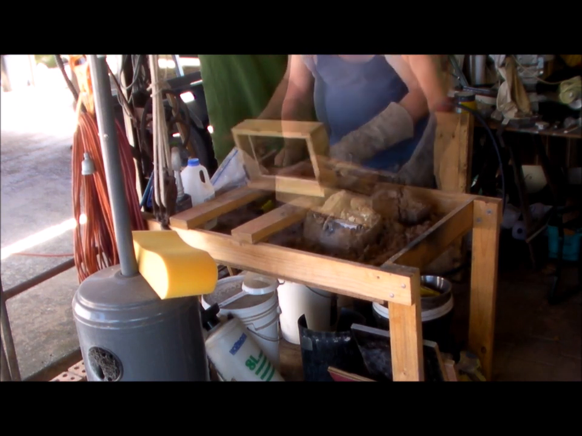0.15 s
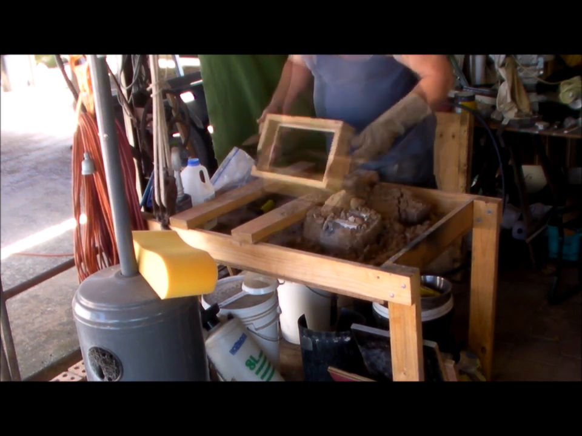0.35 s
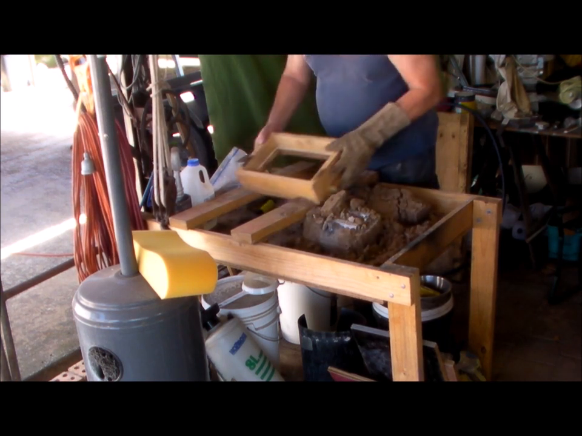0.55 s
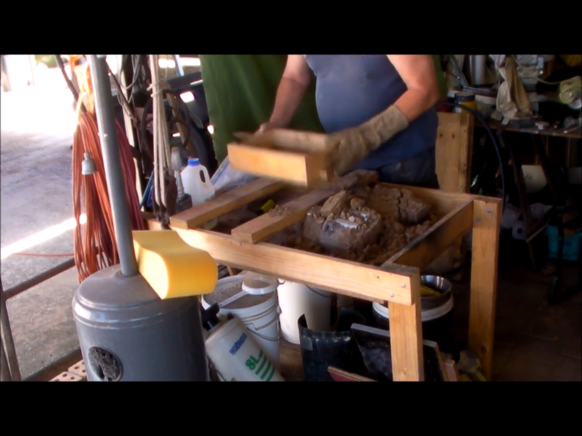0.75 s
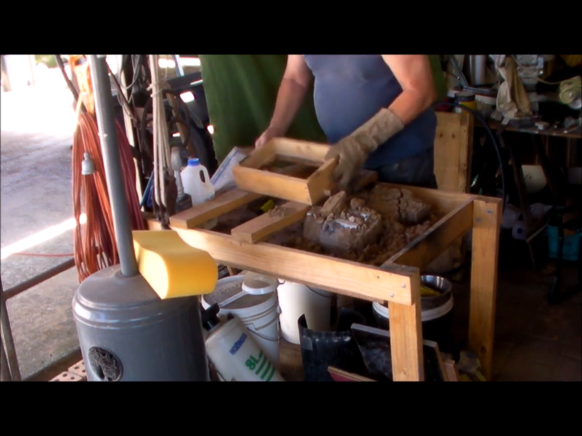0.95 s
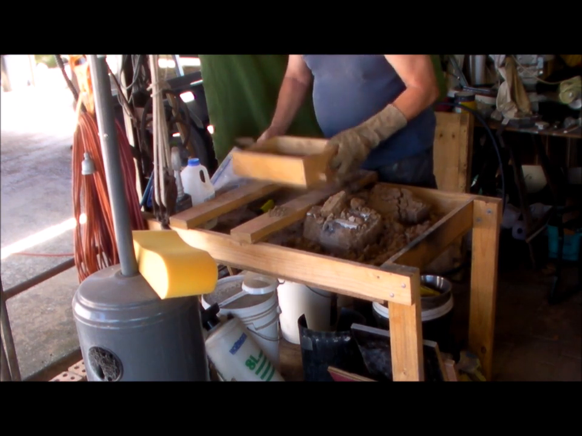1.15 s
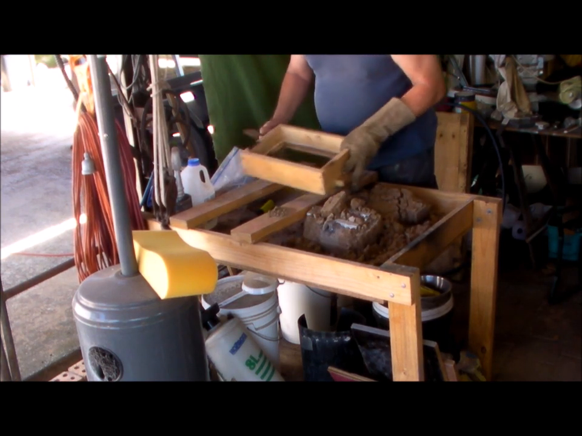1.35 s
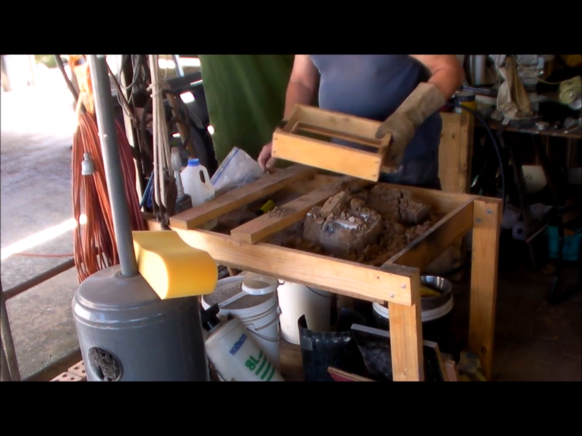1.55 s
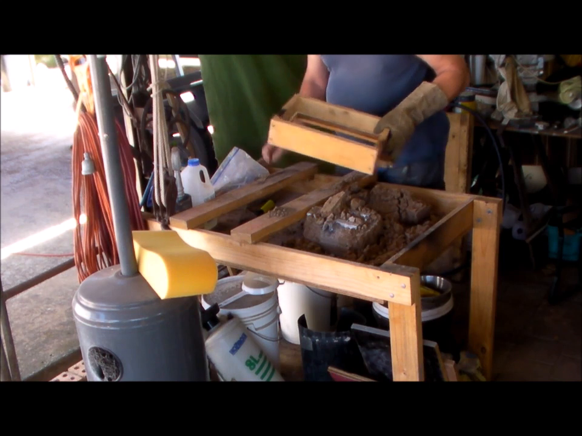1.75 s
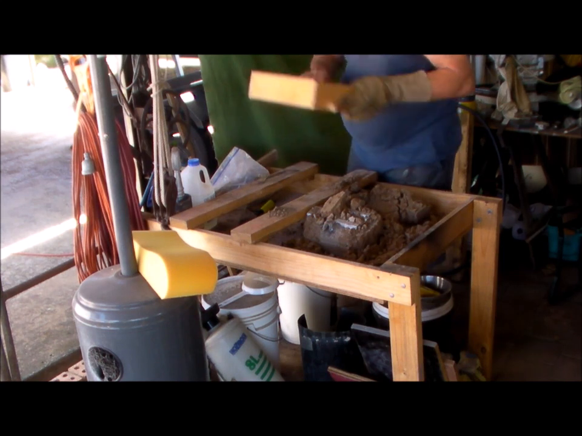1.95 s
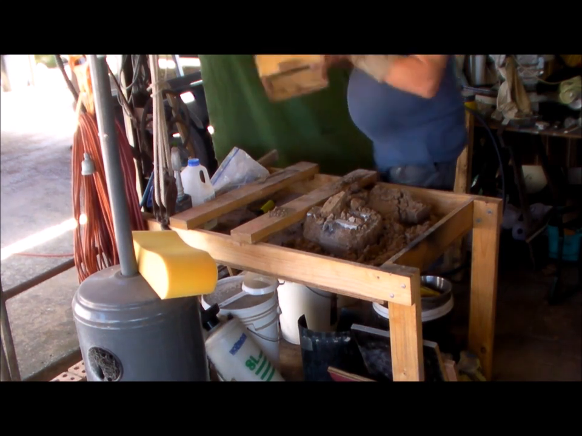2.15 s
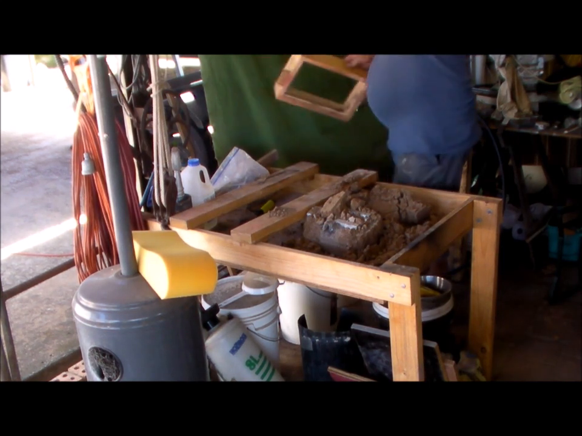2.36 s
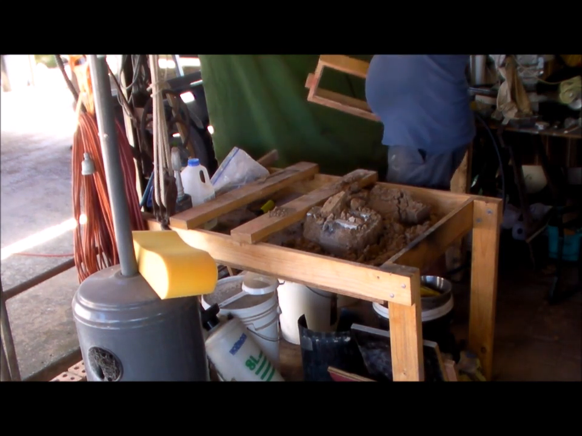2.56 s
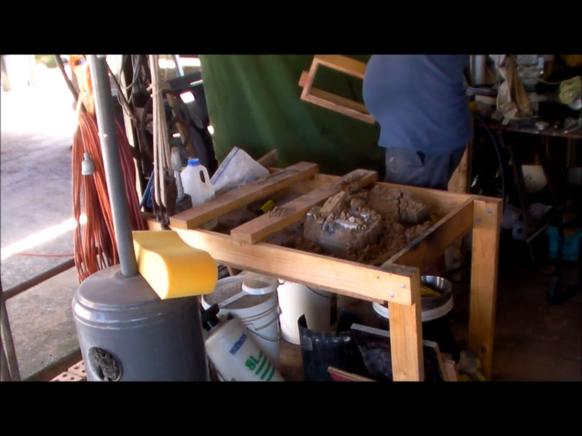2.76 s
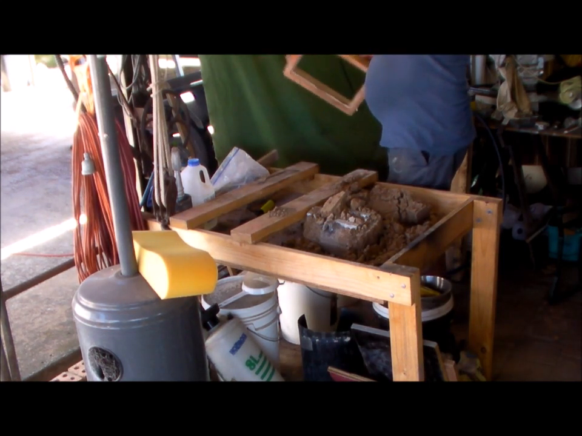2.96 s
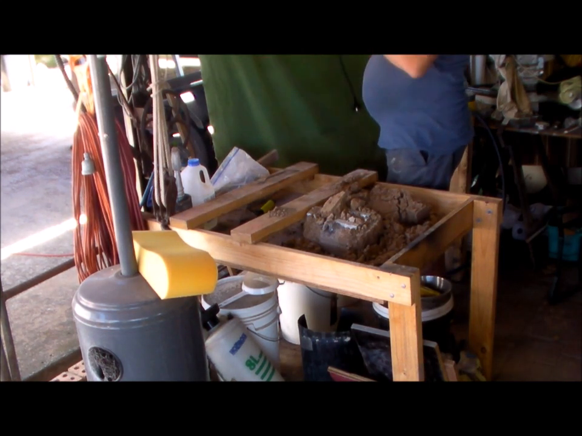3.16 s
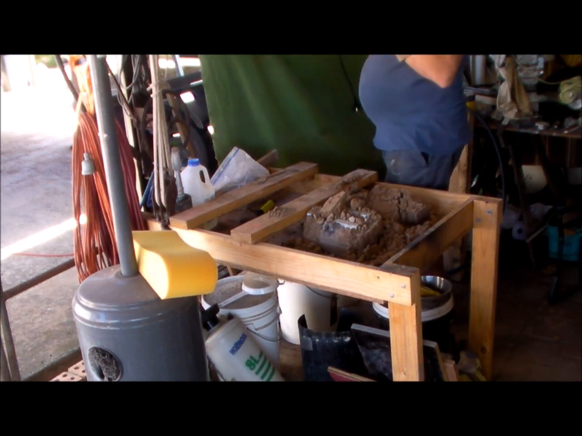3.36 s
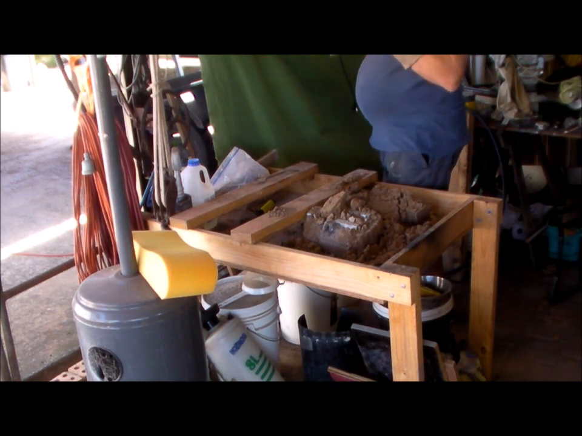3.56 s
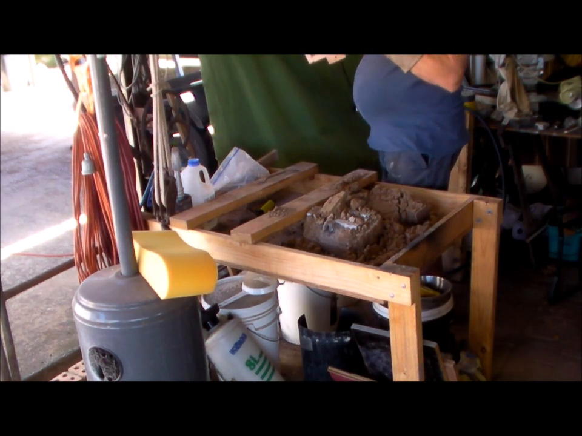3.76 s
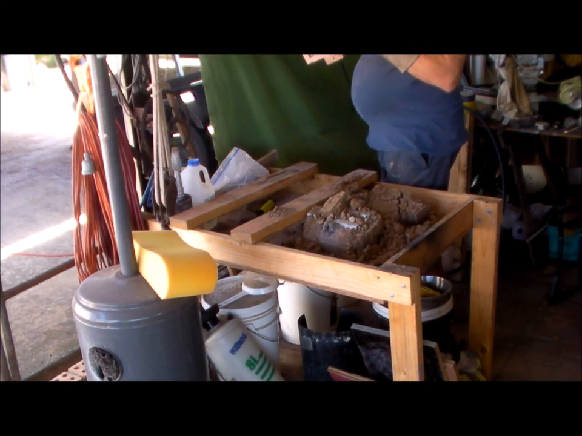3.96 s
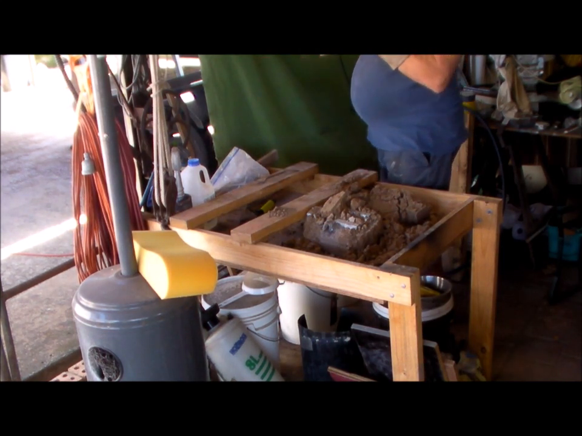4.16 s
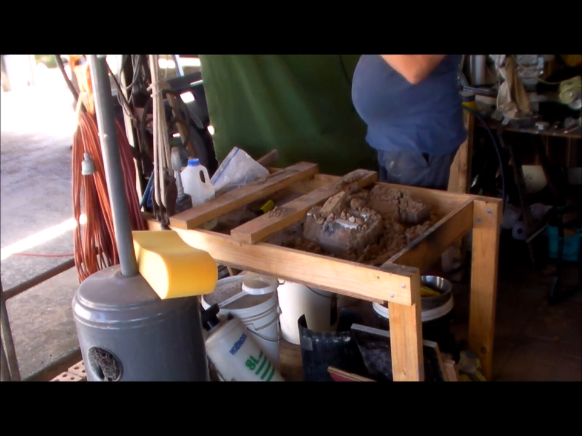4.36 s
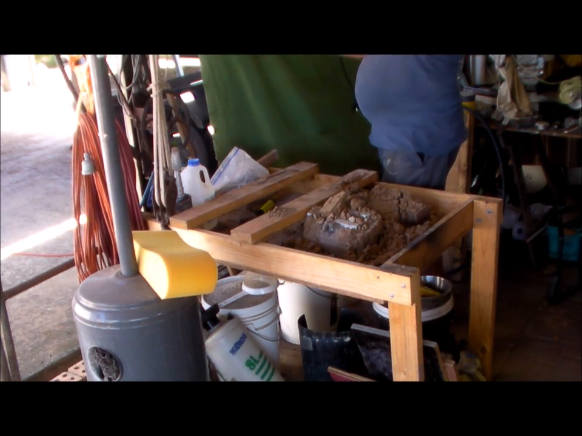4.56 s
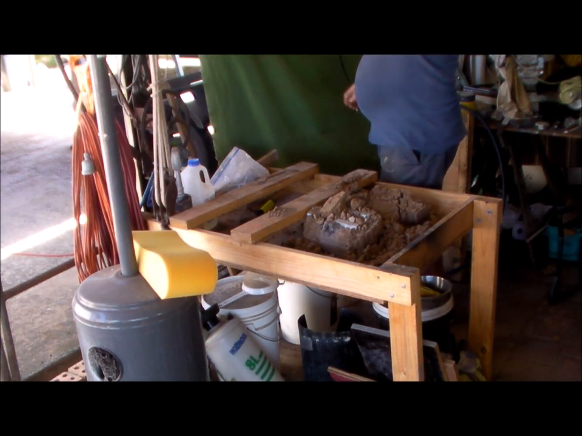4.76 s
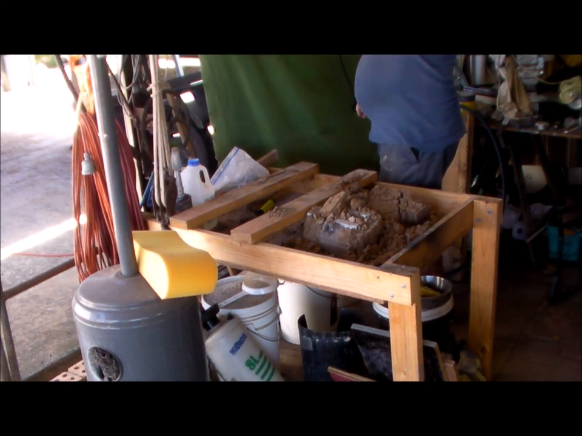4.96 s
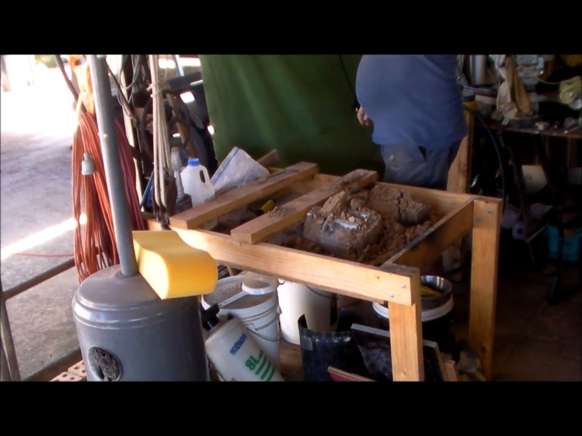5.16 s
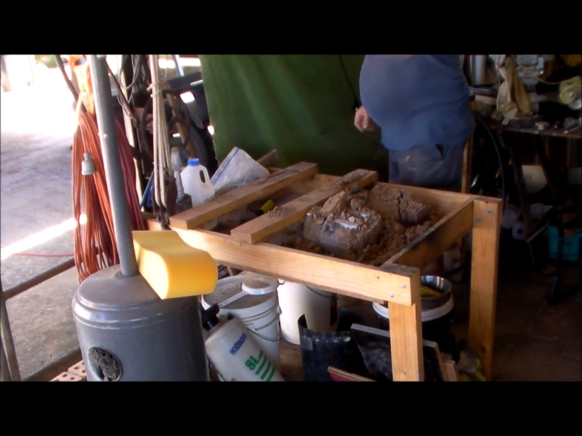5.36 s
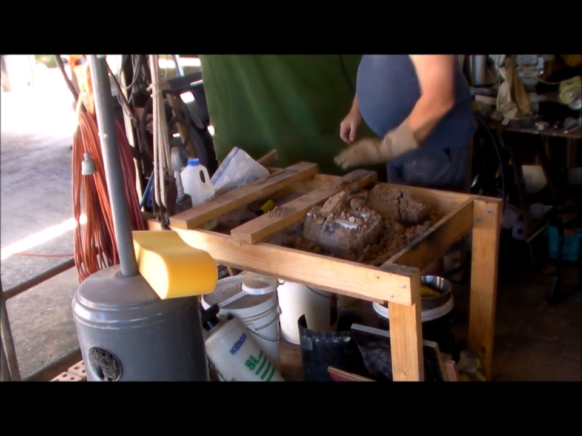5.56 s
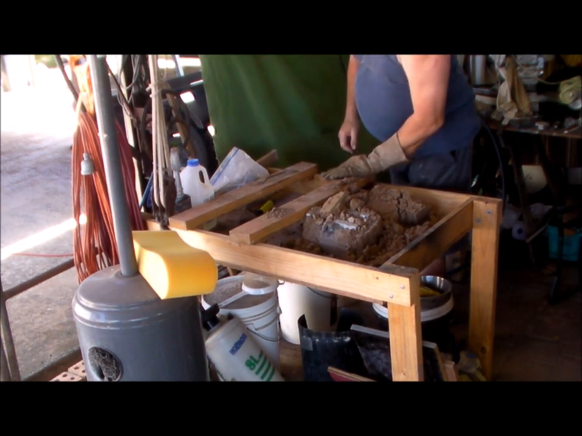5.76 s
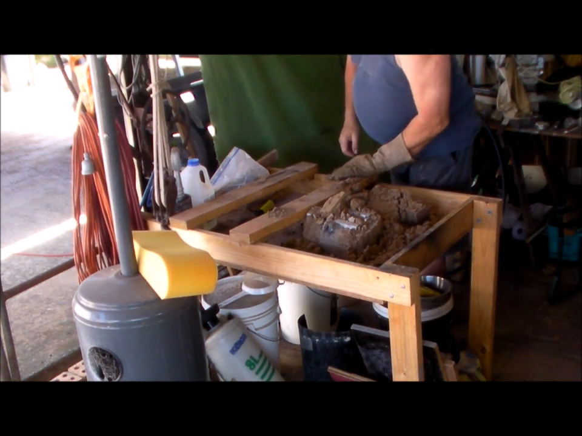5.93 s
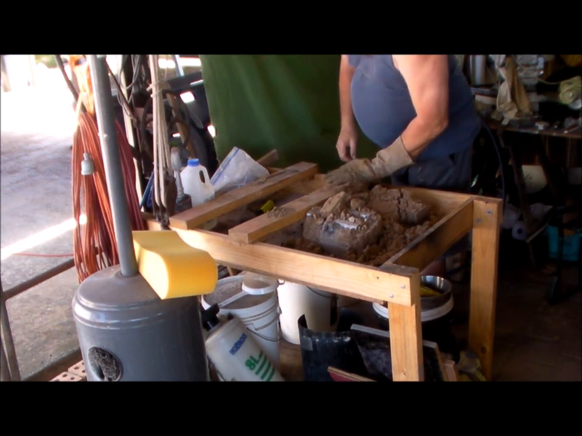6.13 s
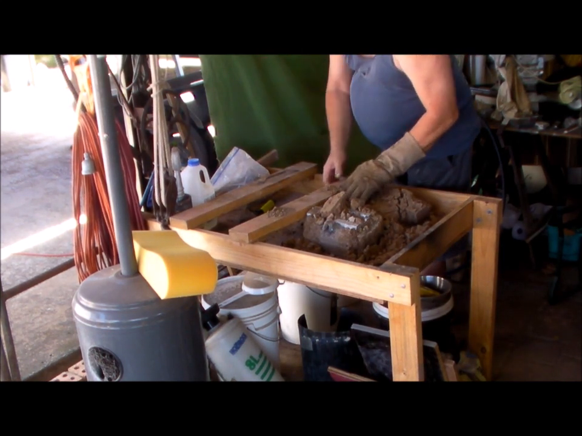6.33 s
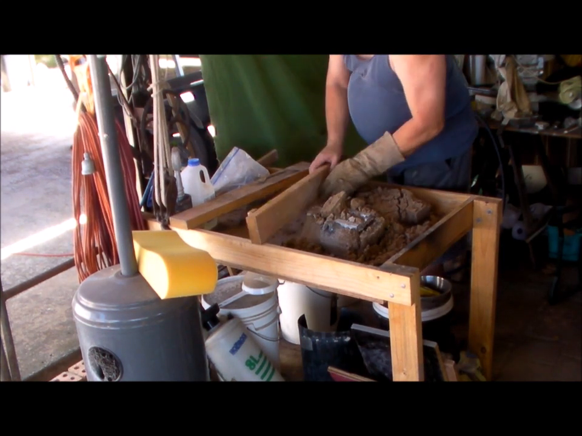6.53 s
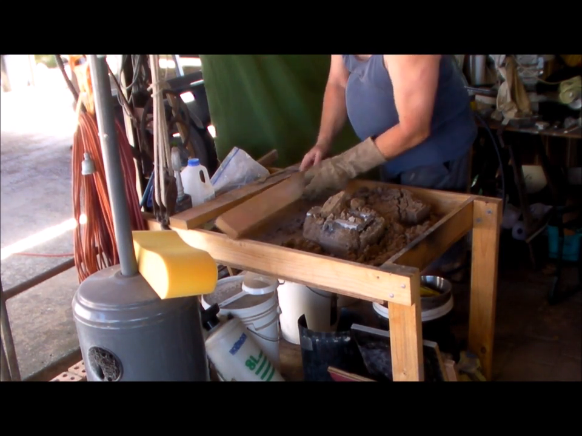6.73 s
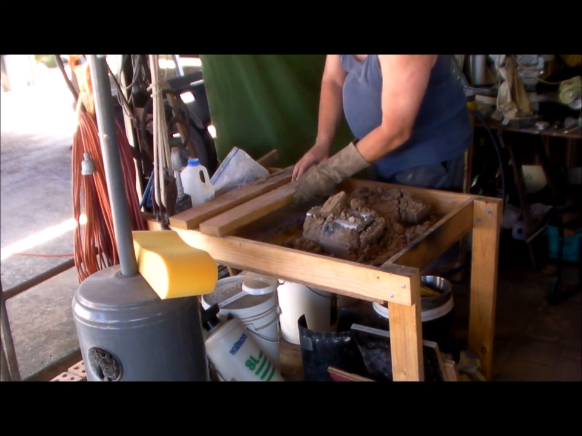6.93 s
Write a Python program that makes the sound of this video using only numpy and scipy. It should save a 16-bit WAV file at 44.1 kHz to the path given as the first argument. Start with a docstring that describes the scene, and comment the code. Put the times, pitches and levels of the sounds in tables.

```python
"""A wooden knock comes first, then the scrape of a moulding frame, four raps to shed its sand, and boards shifted
on a bench in a garage with its door open. Decaying sine modes and bursts of noise make the knocks, which the
walls answer by convolution. Shaped noise makes the sand, squeaks, brushing gloves and cloth, short high ticks,
bird peeps, low rumble and air; two steel modes tinkle and a wavering sine hums far off."""
import sys
import numpy as np
from scipy import signal
from scipy.fft import rfft, irfft, next_fast_len
from scipy.io import wavfile
from scipy.ndimage import uniform_filter1d, map_coordinates

SR = 44100
rng = np.random.default_rng(int(sys.argv[2]) if len(sys.argv) > 2 else 0)


def wav_out(sig):
    """Save sig, one row per channel (or a flat mono array), as 16-bit PCM at SR to the path in sys.argv[1]."""
    wavfile.write(sys.argv[1], SR, np.round(np.clip(np.atleast_2d(sig).T, -1, 1) * 32767).astype(np.int16))


N = 312669

# modes of wooden frames and boards, before each knock varies and damps them: pitch_hz, level_db, t60_s
WOOD_MODES = [(370, -7.5, 0.049), (460.6, -7.5, 0.053), (523, -5, 0.033), (604.5, 0, 0.037),
              (703, -3, 0.057), (773.4, -1, 0.11), (840, 1, 0.034), (924, 3, 0.035), (1048, 1.5, 0.026),
              (1170, -5, 0.046), (1320, -4, 0.059), (1506, 0, 0.047), (1800, 5.5, 0.028),
              (2100, -0.5, 0.036), (2370, 0.5, 0.029), (2620, -2, 0.049), (3000, 3.5, 0.017),
              (3440, 3.5, 0.027), (4290, 0, 0.01)]
DAMPED_ABOVE_HZ = 900  # the gripping hand shortens the upper modes
BOARDS_FROM_S, BOARD_T60_S = 5.5, 0.045  # boards lying on the bench ring no longer than this


def held_wood(start_s):
    """Modal damping: modes vary a little, as between pieces of wood; grip shortens the upper ones."""
    modes = np.array(WOOD_MODES)
    damping = np.maximum(1, modes[:, 0] / DAMPED_ABOVE_HZ) ** 0.7
    modes = modes * (1 + [0.015, 0, 0.2] * rng.standard_normal(modes.shape).clip(-2, 2))
    modes[:, 2] /= damping
    if start_s > BOARDS_FROM_S:
        modes[:, 2] = np.minimum(modes[:, 2], BOARD_T60_S)
    return modes


# knocks of wood on wood, two of them followed by a bounce off the far wall (rows at 1.27 and 6.869 s);
# crack and thud are relative to the ring, whose peak is level_db:
# start_s, level_db, favoured pitch_hz, fall_off_db_per_octave, crack_db, thud_db
KNOCKS = [(0.002, -15, 427, 6.5, -2.5, -8), (0.14, -44.5, 850, 20, 15, -9),
          (0.309, -36.5, 1620, 18, 9.5, -16), (0.841, -8, 1600, 3, 10, -5.5),
          (0.973, -5.5, 935, 7, 3.5, -14.5), (1.101, -8.5, 1430, 3.5, 10.5, -12.5),
          (1.236, -8, 1580, 7, 7, -14), (1.27, -11, 930, 11, -19, -18), (1.669, -46, 810, 9, 5, -26),
          (2.749, -44.5, 1510, 15, 6, 4), (2.858, -48.5, 990, 32.5, 13, -6),
          (2.886, -42.5, 1540, 42, -13, 4), (2.967, -39.5, 1660, 16, 11, 7), (3.701, -46, 1310, 5, 9, 18),
          (3.938, -38, 1260, 9, 6.5, 14), (4.18, -21, 1270, 24, 1.5, -24), (4.183, -32, 3450, 14, -2, -30),
          (4.379, -35, 1200, 13, -3, -14), (4.779, -46.5, 860, 5, 6.5, 7.5), (4.815, -45, 500, 8, 2, 0),
          (4.998, -39.5, 1660, 3, 13, -31), (5.008, -26.5, 2100, 13.5, 6, -35),
          (5.011, -19.5, 1320, 29, -18, -28), (5.672, -28.5, 795, 9, -17, -10),
          (6.408, -32.5, 826, 7, -1.5, 0.5), (6.516, -11.5, 675, 9, -13, -4.5),
          (6.694, -44.5, 1800, 26, -5, -27), (6.757, -15.5, 845, 7, -8.5, -6),
          (6.825, -12, 890, 5, -9, -37), (6.834, -6.5, 1290, 5, 7, -6.5), (6.869, -13.5, 800, 23, -13, -11),
          (7.008, -29.5, 840, 9, -5, -17.5)]
# the hollow bench under a thud: pitch_hz, level_db, t60_s
BENCH_MODES = [(199, -6.5, 0.029), (241, -0.5, 0.031), (321.2, -12.5, 0.044)]
CONTACT_S, SOFTER_PER_DB = 0.001, 0.5  # rise of the ring at 0 dB of crack; less crack rises slower
ECHO_DB, ECHO_CRACK_DB = 3.5, -7.5  # the walls' answer at 0 dB of crack, and the crack's share in it
ECHO_PER_CRACK = 0.36  # a harder contact throws more into the room: dB of echo per dB of crack


def knocks():
    """Modal impact: a blow excites modes near a favoured pitch, contact noise, the bench and the room."""
    out, t = np.zeros((2, N)), np.arange(SR // 5) / SR

    def bright(hz):
        return 1j * hz / 1200 / (1 + 1j * hz / 1200) / (1 + 1j * hz / 3500) ** 2

    for start_s, level_db, spot_hz, fall_db, crack_db, thud_db in KNOCKS:
        favour_db = lambda hz: -fall_db * np.abs(np.log2(hz / spot_hz))
        rise_s = CONTACT_S * amp(-SOFTER_PER_DB * crack_db)
        ring = ringing(held_wood(start_s), t, favour_db, attack=rise_s)
        thud = ringing(BENCH_MODES, t, lambda hz: 0, attack=0.0076)
        body = ring / np.abs(ring).max() + amp(thud_db) * thud
        # gritty faces meet over a few ms
        grit = amp(-60 * t / 0.014) * (1 - np.exp(-t / 0.0005)) * rng.standard_normal(len(t))
        direct = body + amp(crack_db) * filtered(grit, bright)
        add(out, amp(level_db) * direct[None], start_s)
        # the walls hear that burst as one even click
        click = np.linalg.norm(grit) * (t == 0)
        sent = body + amp(crack_db + ECHO_CRACK_DB) * filtered(click, bright)
        echo = signal.fftconvolve(sent[None], walls(), axes=1)
        add(out, amp(level_db + ECHO_DB + ECHO_PER_CRACK * crack_db) * echo, start_s + 0.0041)
    return out


# decay of the walls' answer: pitch_hz, t60_s
WALL_DECAY = [(200, 0.34), (800, 0.3), (3000, 0.24), (12000, 0.33)]
# colour of the walls' answer: pitch_hz, level_db
WALL_COLOUR = [(100, -33.5), (300, 0), (780, -6.5), (1800, -4), (5000, 3), (15000, -1.5)]


def walls():
    """Reverberation: a crowd of near echoes stands above a diffuse tail that dies band by band."""
    hz, t, z = signal.stft(rng.standard_normal((2, SR // 2)), SR, nperseg=256)
    decay = amp(-60 * t / along(WALL_DECAY, hz)[:, None])
    tail = signal.istft(z * decay, SR, nperseg=256)[1]
    t = np.arange(tail.shape[1]) / SR
    near = amp(6 / (1 + (t / 0.042) ** 6))  # the near echoes end once the far wall has answered
    onset = 1 - np.exp(-t / 0.00033)
    tail = spread(tail * near * onset, lambda hz: amp(along(WALL_COLOUR, hz)), wide=0.72)
    return tail / np.linalg.norm(tail[0])


# sand scraped and shaken off the frame: start_s, grinding level_db
SAND = [(0, -51), (.25, -55), (.42, -59), (.5, -45), (.58, -39.5), (.82, -44), (.95, -40), (1.08, -52),
        (1.25, -52), (1.5, -68)]
# relative spectrum of the grinding: pitch_hz, density_db_per_hz
GRIND_SPECTRUM = [(180, -52), (300, -13), (534, -14), (769, -5.5), (907, -6), (1110, -14), (1840, -14.5),
                  (2140, -18.5), (3050, -13.5), (3390, -18), (5000, -18), (6500, -55), (11000, -120)]
# relative spectrum of the trickling: pitch_hz, density_db_per_hz
TRICKLE_SPECTRUM = [(2350, -37.5), (4000, -17), (5830, -9.5), (12700, -11), (16000, -21.5)]
GRAIN_DB, HISS_DB = -8, -4.5  # catching grains and trickling sand against the grinding


def scraped_sand():
    """Granular friction: sand grinds between wooden faces, catches and trickles off."""
    grind_db, = curves(SAND)
    grind = rush(GRIND_SPECTRUM, patchy_db=0.0, grain_db=1.5, grains=190)
    trickle = rush(TRICKLE_SPECTRUM, patchy_db=1.1, grain_db=1.5, grains=600)
    return amp(grind_db) * (grind + amp(GRAIN_DB) * catching_grains() + amp(HISS_DB) * trickle)


GRAINS_PER_S, GRAIN_SPREAD_DB = 900, 3  # spread in dB per natural-log unit of random size


def catching_grains():
    """Stick-slip: coarse grains catch under the scrape and ring for a few cycles at scattered pitches."""
    lasts_s = SAND[-1][0]
    when, pitch, size = rng.random((round(GRAINS_PER_S * lasts_s), 3)).T
    t = np.arange(SR // 50) / SR
    hz = (800 * 5 ** pitch)[:, None]
    strength = amp(-GRAIN_SPREAD_DB * np.log(size + 1e-3))[:, None]
    chips = strength * np.sin(2 * np.pi * hz * t) * np.exp(-hz * t / 6)
    at = (when * lasts_s * SR).astype(int)[:, None] + np.arange(len(t))
    x = np.bincount(at.ravel(), chips.ravel(), N)[:N]  # overlapping grains sum
    return x / np.std(x[:round(lasts_s * SR)])


# brief squeaks of the scraped frame, level before the swell: start_s, length_s, pitch_hz, level_db
SQUEAKS = [(.33, .04, 1650, -57), (.5, .04, 2090, -47), (.55, .05, 900, -41), (.58, .11, 3050, -48),
           (.62, .04, 880, -41), (5.18, .06, 3100, -67)]


def squeaks():
    """Frictional excitation: rubbed wood squeaks as a very narrow band of noise."""
    return narrow_bands(SQUEAKS, width_hz=40)


# gloves, cloth and shoes brushing past, and a few very short high ticks;
# level before the swell and centre before the treble tilt: start_s, length_s, level_db, centre_hz
BRUSHES_AND_TICKS = [(0.138, 0.016, -42, 7000), (.264, .016, -48.5, 8600), (0.297, 0.0084, -53.5, 8500),
                     (1.428, 0.034, -58.5, 9810), (1.75, 0.089, -58.5, 3000), (2.07, 0.063, -60, 6050),
                     (2.473, 0.007, -52.5, 6600), (2.556, 0.057, -52.5, 9200), (2.63, 0.12, -57, 4137),
                     (2.728, 0.098, -53.5, 4040), (2.852, 0.13, -56.5, 3826), (3.309, .1, -56.5, 10500),
                     (3.76, .1, -55.5, 9700), (3.91, 0.15, -59.5, 7360), (4.02, 0.14, -52.5, 4620),
                     (4.124, 0.13, -53, 4000), (4.407, 0.083, -54.5, 8930), (4.653, 0.01, -56.5, 7000),
                     (4.725, 0.073, -58, 9200), (4.774, 0.14, -55.5, 500), (4.987, 0.068, -54.5, 9600),
                     (5.159, 0.12, -60.5, 5100), (5.397, 0.082, -56.5, 4970), (5.639, .11, -50.5, 3000),
                     (5.924, 0.16, -58.5, 2590), (6.101, 0.089, -50.5, 5770), (6.18, 0.09, -51, 3000),
                     (6.412, 0.11, -52.5, 3890), (6.504, 0.084, -52.5, 8340), (6.651, .07, -57.5, 3460),
                     (6.78, 0.055, -61, 8050), (6.95, .1, -52, 5770)]
# half-width of a stroke at 10 kHz, octaves gained per octave lower, and the widest
THINNEST_OCTAVES, WIDENS, WIDEST_OCTAVES = 0.69, 2.9, 3.1


def brushes_and_ticks():
    """Broadband noise: gloves, cloth and shoes brush past, with short ticks; low strokes span more octaves."""
    out = np.zeros((2, N))
    for start_s, length_s, level_db, centre_hz in BRUSHES_AND_TICKS:
        octaves = THINNEST_OCTAVES + WIDENS * np.log2(10000 / centre_hz)
        octaves = np.clip(octaves, 0.3, WIDEST_OCTAVES)
        bumps_db = 3 * rng.standard_normal(24)  # each stroke has its own uneven colour
        bumps_hz = np.linspace(0, SR / 2, len(bumps_db))

        def colour(hz):
            hump = np.exp(-(np.log2((hz + 1) / centre_hz) / octaves) ** 2)
            tilt = 1 / np.sqrt(hz + 100)
            return hump * tilt * amp(np.interp(hz, bumps_hz, bumps_db))

        add(out, amp(level_db) * swelling(length_s, colour, sharp=1.1), start_s)
    return out


# a loose steel part: start_s, level_db
TINKLES = [(1.668, -69), (1.745, -67)]
# its modes, before each strike varies their strength: pitch_hz, level_db, t60_s
STEEL_MODES = [(11590, 0, .25), (12080, -2, .2)]


def tinkles():
    """Modal ringing of a lightly damped solid: a small steel part sounds two thin, high modes."""
    out, t = np.zeros((2, N)), np.arange(SR // 4) / SR
    for start_s, level_db in TINKLES:
        ring = ringing(STEEL_MODES, t, lambda hz: 0, attack=0.00079)
        add(out, amp(level_db) * ring[None], start_s)
    return out


# bird peeps, level before the swell: start_s, length_s, pitch_hz, level_db
PEEPS = [(1.644, 0.051, 6600, -68.5), (1.77, 0.079, 6400, -68), (2.029, 0.091, 6450, -67.5),
         (2.742, 0.061, 6600, -59), (2.908, 0.028, 6540, -66), (3.307, 0.098, 6420, -66),
         (3.441, 0.056, 6430, -64.5), (3.462, 0.071, 5500, -68.5), (4.652, 0.13, 6520, -68.5),
         (5.46, 0.13, 8040, -70), (6.66, 0.63, 7900, -67.5)]


def peeps():
    """Narrow-band noise: each rough bird peep is a band about one pitch that swells and fades."""
    return narrow_bands(PEEPS, width_hz=280)


# level of the rumble, before its wavering: start_s, level_db
RUMBLE_LEVEL = [(0, -35), (.15, -55), (.85, -51.5), (1.3, -62.5), (2.4, -68.5), (2.7, -57), (3, -57.5),
                (3.3, -65), (3.65, -64.5), (4.05, -54), (4.4, -58.5), (4.7, -67), (4.85, -55.5), (5.2, -62),
                (5.7, -64.5), (6, -59.5), (6.4, -64.5), (7.09, -56)]
# relative spectrum of the rumble: pitch_hz, density_db_per_hz
RUMBLE_SPECTRUM = [(65, -44.5), (110, -40), (119, -21), (188, -6.5), (270, -11), (469, -19.5), (500, -19),
                   (650, -44.5), (1100, -120)]


def rumble():
    """Low-frequency ambience: shaped noise of wavering level comes through the open door."""
    level_db, = curves(RUMBLE_LEVEL)
    return amp(level_db + 1.5 * wobble(9)) * rush(RUMBLE_SPECTRUM, patchy_db=2.2)


# relative spectrum of the deep bass: pitch_hz, density_db_per_hz
DEEP_SPECTRUM = [(12, -27.5), (20, -26.5), (70, -5), (103, 3.5), (140, -7.5), (180, -14.5), (310, -120)]
DEEP_DB, DEEP_START_DB, DEEP_SETTLES_S = -72.5, 14.5, 0.75  # settled level, extra at the start


def deep_bass():
    """Bass noise with a level envelope: it starts stronger, then settles and wavers."""
    t = np.arange(N) / SR
    extra_db = DEEP_START_DB / (1 + (t / DEEP_SETTLES_S) ** 4)
    return amp(DEEP_DB + extra_db + 2.5 * wobble(4)) * rush(DEEP_SPECTRUM, patchy_db=1.0)


HUM_FROM_S, HUM_TO_S, HUM_FADE_S = 1.4, 2.9, 0.072
HUM_HZ, HUM_START_DB, HUM_GROWS_DB_PER_S = 290, -69, 3


def far_hum():
    """Frequency and amplitude modulation: a faint far sine wavers as it grows, then goes."""
    t = np.arange(N) / SR
    fade = np.clip(np.minimum(t - HUM_FROM_S, HUM_TO_S - t) / HUM_FADE_S, 0, 1)
    level_db = HUM_START_DB + HUM_GROWS_DB_PER_S * (t - HUM_FROM_S) + 1.2 * wobble(6.1)
    phase = 2 * np.pi * np.cumsum(HUM_HZ + 3 * wobble(26.1)) / SR
    return fade * amp(level_db) * np.sin(phase)


# relative spectrum of the room's air: pitch_hz, density_db_per_hz
AIR_SPECTRUM = [(35, -32), (60, -51.5), (91, -17.5), (139, -17), (193, 12.5), (238, -27.5), (274, -21),
                (515, -17.5), (749, 6.5), (842, 4), (1200, -3.5), (1700, -4), (2050, -12), (12400, -14.5),
                (16000, -18.5)]
AIR_DB = -62


def room_air():
    """Background noise floor: the steady air of the room, as shaped noise."""
    return amp(AIR_DB) * rush(AIR_SPECTRUM, patchy_db=0.56)


def ringing(modes, t, boost_db, attack):
    """Modal superposition: decaying sines of alternating sign, struck at new strengths."""
    hz, db, t60 = np.transpose(modes)[:, :, None]
    db = db + boost_db(hz) + rng.normal(0, 2, hz.shape)
    sign = (-1) ** np.arange(len(hz))[:, None]
    sines = sign * amp(db - 60 * t / t60) * np.sin(2 * np.pi * hz * t)
    return np.sum(sines, axis=0) * (1 - np.exp(-t / attack))


def narrow_bands(rows, width_hz):
    """Band-limited noise: a Gaussian band about each row's pitch swells and fades."""
    out = np.zeros((2, N))
    for start_s, length_s, pitch_hz, level_db in rows:
        band = lambda hz: np.exp(-((hz - pitch_hz) / width_hz) ** 2)
        add(out, amp(level_db) * swelling(length_s, band, sharp=0.2), start_s)
    return out


def swelling(length_s, gain, sharp):
    """Amplitude envelope: coloured stereo noise swells and fades once, with a grainy flutter."""
    t = np.arange(SR // 4) / SR
    flutter_db = 2.5 * map_coordinates(rng.standard_normal(200), [t * 500])
    band = unit(spread(rng.standard_normal((2, len(t))) * amp(flutter_db), gain, wide=0.79))
    return band * np.abs(np.sin(np.pi * np.clip(t / length_s, 0, 1) ** 0.69)) ** sharp


def rush(spectrum, patchy_db, grain_db=0.0, grains=300):
    """Spectral shaping: stereo noise of rms 1 with patches of random gain and a grainy flutter."""
    z = signal.stft(rng.standard_normal((2, N)), nperseg=512)[2]
    field = uniform_filter1d(rng.standard_normal(z.shape[1:]), size=5, axis=0)
    field = uniform_filter1d(field, size=10, axis=1)
    pair = signal.istft(z * amp(patchy_db * unit(field)), nperseg=512)[1][:, :N]
    pair = pair * amp(grain_db * wobble(grains))
    return unit(spread(pair, lambda hz: amp(along(spectrum, hz))))


# left-right likeness: pitch_hz, correlation (no unit)
LIKENESS = [(60, 0.97), (180, 0.99), (550, 0.95), (1650, 0.91), (4970, 0.59), (15000, 0.11)]


def spread(pair, gain, wide=1.0):
    """Interaural coherence: two unrelated signals mix to left and right, less alike in the treble."""
    def turn(hz):
        return wide * np.arccos(np.clip(along(LIKENESS, hz), -1, 1)) / 2

    mid, side = filtered(pair, lambda hz: gain(hz) * [np.cos(turn(hz)), np.sin(turn(hz))])
    return np.array([mid + side, mid - side])


def filtered(x, response):
    """Linear filtering: the spectrum of x times a response of frequency."""
    m = next_fast_len(x.shape[-1] + 8192)  # padding keeps the tail from wrapping round
    return irfft(rfft(x, m) * response(np.fft.rfftfreq(m, 1 / SR)), m)[..., :x.shape[-1]]


def wobble(rate):
    """Slow modulation: a smooth random curve, rate knots a second."""
    knots = rng.standard_normal(int(N * rate / SR) + 4)
    return map_coordinates(knots, [np.arange(N) * rate / SR])


def curves(rows):
    """Linear interpolation: one value per sample for each column after the time."""
    s, *cols = np.transpose(rows)
    return [np.interp(np.arange(N) / SR, s, c) for c in cols]


def along(points, hz):
    """Logarithmic frequency scale: (pitch_hz, value) points interpolated at hz."""
    f, v = np.transpose(points)
    return np.interp(np.log(hz + 1), np.log(f + 1), v)


def add(out, x, start_s):
    """Superposition: mix x into out from start_s."""
    part = out[:, max(round(start_s * SR), 0):][:, :x.shape[-1]]
    part += x[..., :part.shape[1]]


def unit(x):
    """Normalisation: x scaled to rms 1."""
    return x / np.sqrt(np.mean(x ** 2) + 1e-20)


def amp(db):
    """Decibel law: the amplitude gain of a level."""
    return 10 ** (np.asarray(db) / 20)


def scene():
    """Superposition of everything heard in the garage."""
    handling = knocks() + scraped_sand() + squeaks() + brushes_and_ticks() + tinkles()
    return handling + peeps() + rumble() + deep_bass() + far_hum() + room_air()


TOP_HZ = 15800


def record(dry):
    """Microphone response: deepest bass drops, the left port is a little duller, a band limit ends the treble."""
    def ports(hz):
        tilt_db = 0.18 + 0.61 * (hz / 12000) ** 2
        bass_cut = (1j * hz / (30 + 1j * hz)) ** 2
        return amp(np.outer([-1, 1], tilt_db)) * bass_cut

    return filtered(dry, lambda hz: (hz < TOP_HZ) * ports(hz))


dry = scene()
out = record(dry)
wav_out(out)
```